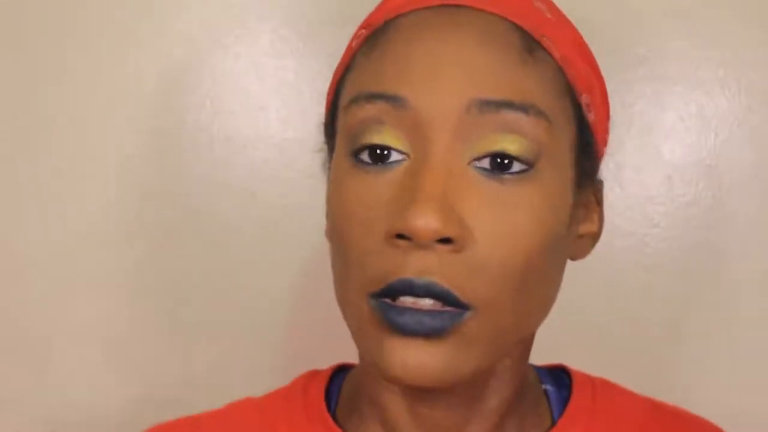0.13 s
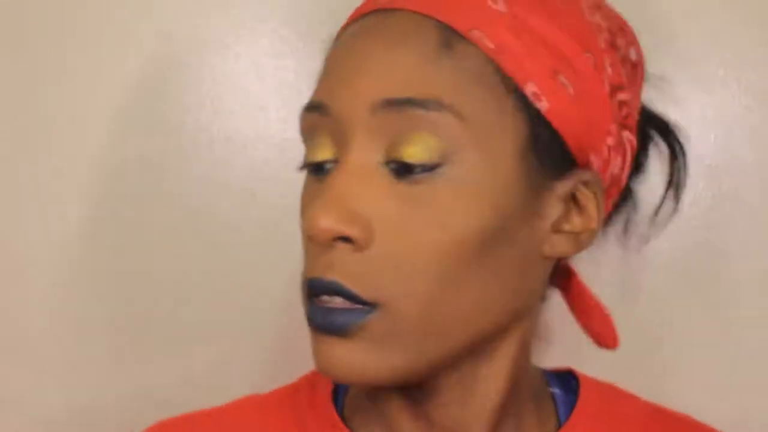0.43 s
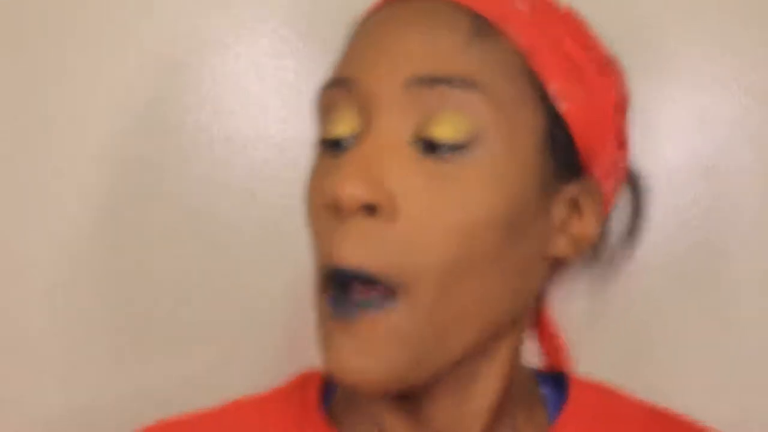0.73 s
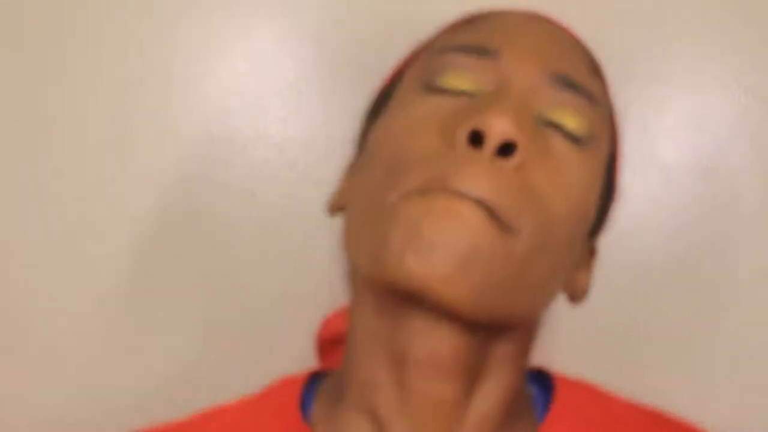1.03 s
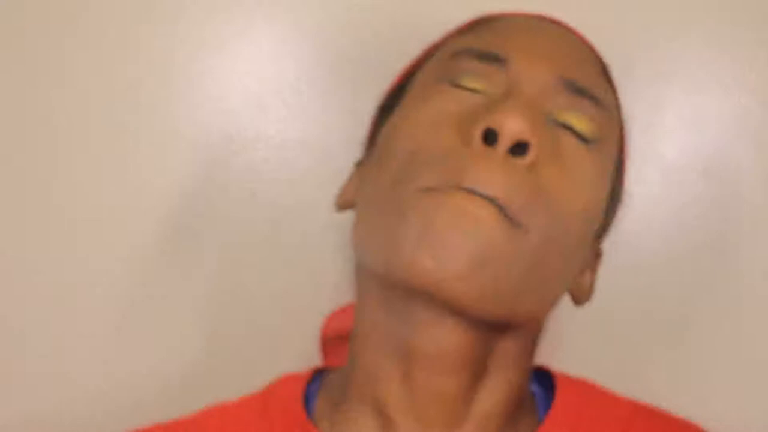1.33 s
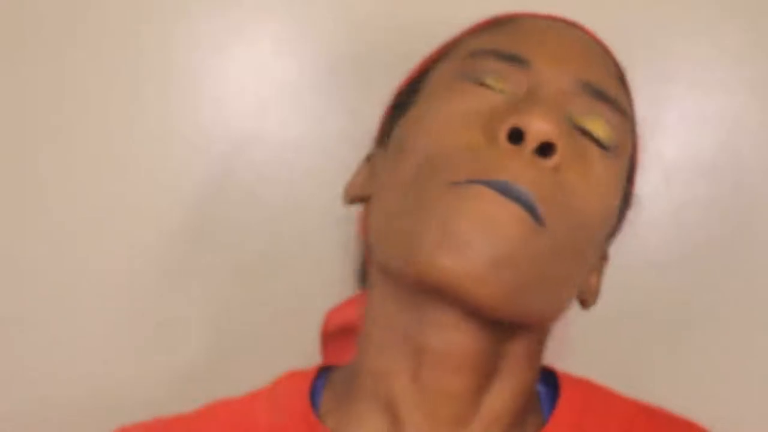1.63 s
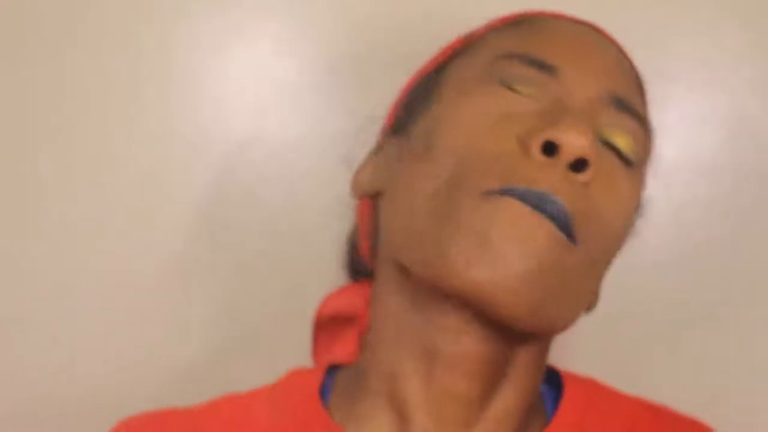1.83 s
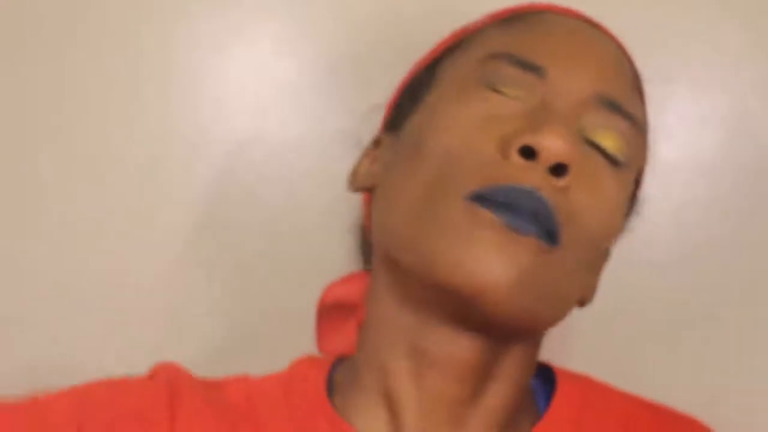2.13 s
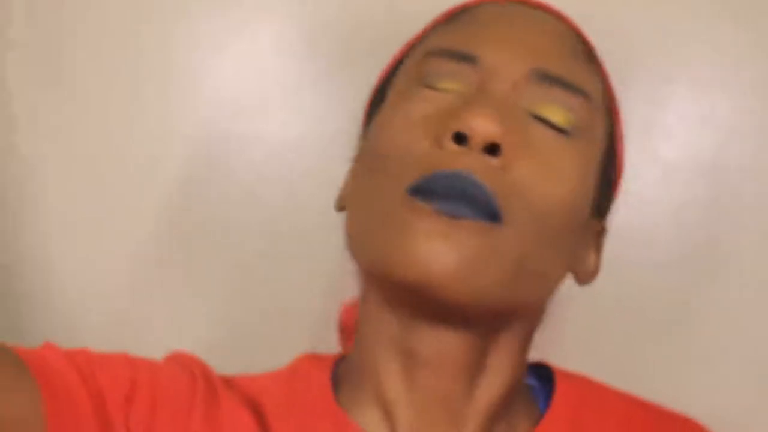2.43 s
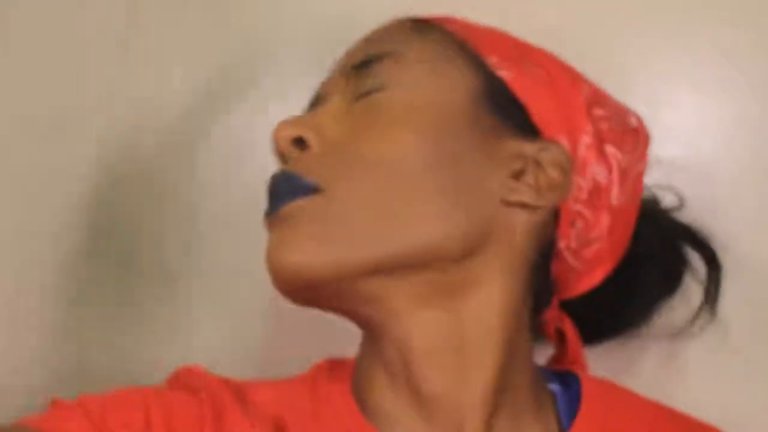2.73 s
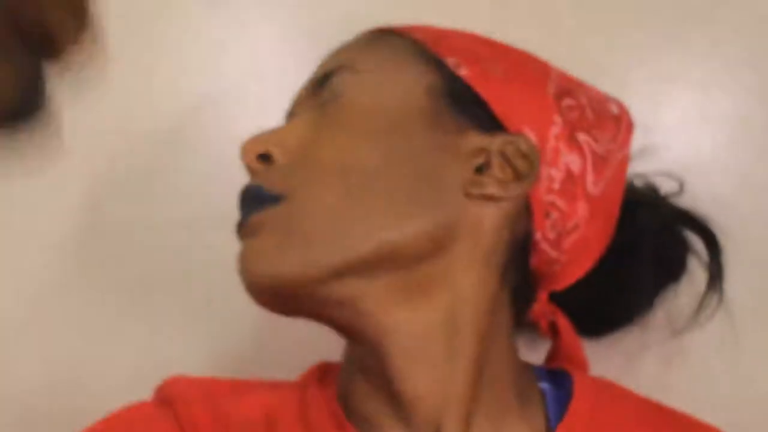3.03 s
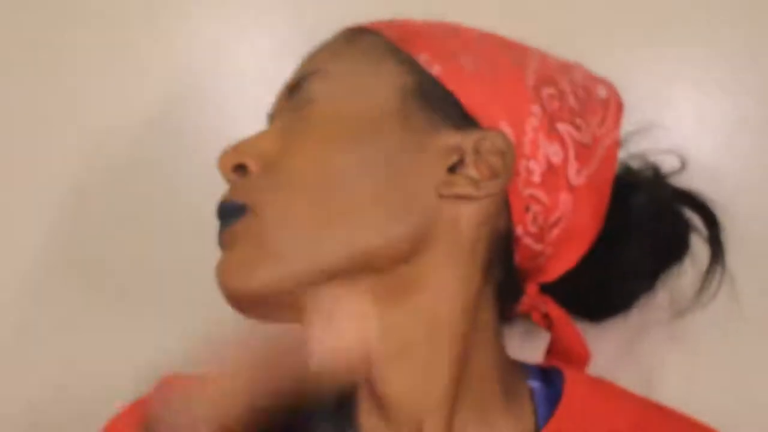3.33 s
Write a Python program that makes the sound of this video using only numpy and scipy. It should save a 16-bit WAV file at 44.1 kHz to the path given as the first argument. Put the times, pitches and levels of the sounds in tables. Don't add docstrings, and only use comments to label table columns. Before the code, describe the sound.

Pump spray bottle close to the microphone: brisk sloshing, a sharp cap pop, light plastic knocks, then six evenly spaced mist puffs with small gurgles and clicks between, in a quiet, lively indoor room with faint fan hum.

```python
import sys
import numpy as np
from scipy import signal
from scipy.fft import rfft, irfft, next_fast_len
from scipy.io import wavfile
from scipy.ndimage import uniform_filter1d

SR = 44100
rng = np.random.default_rng(int(sys.argv[2]) if len(sys.argv) > 2 else 0)


def invert_db(x):
    u = np.asarray(x, float) / 20
    return 10 ** u


def dump_mix(stems):
    frames = np.atleast_2d(stems).T
    limited = np.clip(frames, -1, 1)
    pcm = np.round(limited * 32767).astype(np.int16)
    wavfile.write(sys.argv[1], SR, pcm)


N = 154350


def unit(x):
    return x / np.sqrt(np.mean(x ** 2) + 1e-20)


def along(points, hz):
    f, v = np.transpose(points)
    return np.interp(np.log(hz + 1), np.log(f + 1), v)


def filtered(x, response):
    size = next_fast_len(N + 8192)
    hz = np.fft.rfftfreq(size, 1 / SR)
    return irfft(rfft(x, size) * response(hz), size)[..., :N]


def coloured(x, spectrum):
    return unit(filtered(x, lambda hz: invert_db(along(spectrum, hz))))


def patchy(patchy_db):
    z = signal.stft(rng.standard_normal(N), nperseg=256)[2]
    field = uniform_filter1d(rng.standard_normal(z.shape), 5, 0)
    field = uniform_filter1d(field, 8, 1)
    return signal.istft(z * invert_db(patchy_db * unit(field)), nperseg=256)[1][:N]


def grains(per_s, spread_db):
    when, size, sign = rng.random((3, N))
    height = invert_db(-spread_db * np.log(size + .05))
    return unit((when < per_s / SR) * height * np.sign(sign - .5))


def clicks(rows, t60, spread, crack_db, gain_db, late_s=.0012):
    out, t = np.zeros(N + SR), np.arange(1500) / SR
    for s, db, hz in rows:
        scatter = np.linspace(-1, 1, num=7) + rng.normal(0, .1, size=7)
        pitch = hz * np.exp(spread * scatter)[:, None]
        loudness = invert_db(-9 * np.abs(np.log(pitch / hz)) / spread)
        ring = (loudness * np.sin(2 * np.pi * pitch * t + rng.random((7, 1)))).sum(axis=0)
        crack = invert_db(crack_db - 60 * t / .003) * rng.standard_normal(len(t))
        band = [hz / 3.2, min(2.4 * hz, SR / 2.5)]
        click = signal.lfilter(*signal.butter(2, band, "band", fs=SR), ring * invert_db(-60 * t / t60) + crack)
        start = round((s + late_s) * SR)
        out[start:][:len(t)] += invert_db(db + gain_db) * click / np.abs(click).max()
    return out[:N]


def shaking():
    # (time [s], level [dB])
    trickle = [(0, -40), (.3, -41.5), (.6, -42.5), (.7, -56)]
    # (frequency [Hz], level [dB per Hz])
    liquid_colour = [(180, -39), (300, -21), (558, -20), (1060, -6.5), (1740, -5.5), (2480, 5), (6450, 4.5),
                     (15200, -26), (16500, -55)]
    # (time [s], level [dB], fade [s])
    surges = [(0.035, -26, 0.02), (.068, -35, 0.0095), (0.095, -26, 0.0097), (0.122, -26, 0.036),
              (.21, -28, 0.032), (0.292, -23, 0.015), (0.334, -32.5, 0.025), (.401, -28, 0.013),
              (.448, -55, 0.014), (.49, -37, 0.028), (.53, -31.5, 0.016), (.577, -50, 0.061)]
    # (time [s], peak level [dB], ring pitch [Hz])
    slaps = [(.0350, -20, 3000), (.0380, -17, 4300), (.0432, -16, 4500), (.0680, -16, 2600),
             (.0970, -21, 2500), (.1080, -21, 4000), (.1212, -11, 2900), (.1275, -11, 3600),
             (.1332, -13, 4500), (.1585, -17, 2600), (.2175, -17, 3800), (.2222, -16, 3500),
             (.2932, -13, 2700), (.2992, -16, 3000), (.3998, -16, 3400), (.4062, -16, 3300),
             (.4490, -21, 3500), (.5282, -18, 4500), (.5412, -20, 3500), (.5782, -22, 3500),
             (.5948, -22, 5000)]
    rise_s = 0.0078
    t = np.arange(N) / SR
    level = invert_db(np.interp(t, *np.transpose(trickle), right=-120))
    for s, db, fade in surges:
        since = np.clip(t - s, 0, 9)
        level = level + invert_db(db) * (1 - np.exp(-since / rise_s)) * np.exp(-(since / fade) ** 2)
    drops = grains(per_s=3400, spread_db=3.5)
    fizz = invert_db(0.5) * patchy(patchy_db=-2)
    liquid = level * coloured(unit(drops + fizz), liquid_colour)
    return liquid + clicks(slaps, t60=.003, spread=0.34, crack_db=11.5, gain_db=2, late_s=0)


def air():
    # (frequency [Hz], level [dB per Hz])
    air_colour = [(15, -12), (25, -9), (118, -1), (878, -7), (1180, -11), (1360, -9), (1730, -9.5),
                  (15200, -25), (16500, -14.5)]
    # (frequency [Hz], likeness [0-1])
    alike = [(30, 0.48), (60, 0.25), (200, 0.092), (800, 0.1), (8000, 0.96)]
    # (frequency [Hz], unsteadiness [Hz], level [dB])
    hum_tones = [
        (79, 5, 0),
        (144, 5, -5.5),
    ]
    # (time [s], level [dB])
    fan = [(0.0, -71), (0.74, -64), (0.81, -87), (0.94, -65.5), (2.63, -61), (2.78, -75), (2.88, -64.5),
           (3.47, -69), (3.5, -115)]
    air_db, air_top_hz, wobble_db = -52.5, 15100, 1.5

    def middle_and_side(hz):
        turn = np.arccos(np.clip(along(alike, hz), -1, 1)) / 2
        return invert_db(along(air_colour, hz)) * (hz < air_top_hz) * np.array([np.cos(turn), np.sin(turn)])

    def slow(top_hz):
        return unit(filtered(rng.standard_normal(N), lambda hz: hz < top_hz))

    mid, side = filtered(rng.standard_normal((2, N)), middle_and_side)
    t, hum = np.arange(N) / SR, np.zeros(N)
    for hz, unsteady_hz, db in hum_tones:
        strength = invert_db(db + 1 + wobble_db * slow(unsteady_hz))
        hum += strength * np.sin(2 * np.pi * hz * t + .5 * slow(unsteady_hz))
    hum *= invert_db(np.interp(t, *np.transpose(fan)))
    return invert_db(air_db) * unit(np.array([mid + side, mid - side])) + hum


def cap():
    # (time [s], peak level [dB], ring pitch [Hz])
    pops = [
        (.7128, -22, 3420),
        (.7166, -8, 4080),
        (.7170, -26, 1140),
        (.7228, -18, 4320),
    ]
    # (time [s], peak level [dB], ring pitch [Hz])
    knocks = [
        (.7728, -26, 2320),
        (.812, -30.5, 2020),
        (.826, -27, 2440),
        (.84, -33, 2400),
        (.856, -33.5, 2400),
        (.975, -23.5, 2070),
        (1.072, -43, 2500),
    ]
    pop = clicks(pops, t60=0.0068, spread=0.507, crack_db=3.5, gain_db=4.5, late_s=0)
    return pop + clicks(knocks, t60=.012, spread=.3, crack_db=-6, gain_db=4.5, late_s=0)


def mist():
    # (start [s], length [s], level [dB], time to full pressure [s], nozzle ring [dB])
    strokes = [
        (1.098, 0.15, -37.5, 0.11, -1),
        (1.55, 0.16, -36.5, 0.11, 1.5),
        (1.981, .15, -36, 0.073, 1),
        (2.376, .13, -35.5, 0.073, 2),
        (2.744, .15, -32.5, 0.073, 1),
        (3.137, 0.14, -32.5, 0.047, -1),
    ]
    trebles_db = [1.2, 1, 3.4, 1.4, -0.4, -2.4]
    # (frequency [Hz], level [dB per Hz])
    mist_colour = [(180, -67), (300, -29.5), (1250, -10.5), (2650, -1.5), (3970, -2), (6340, -1),
                   (10900, -5.5), (15200, -16), (16500, -33)]
    start_db, sag_db, attack_s, release_s = -7, -3, 0.0083, 0.015
    nozzle_hz, nozzle_wide_hz, sheen_hz, sheen_grows = 6300, 2500, 7700, 0.89
    t = np.arange(N) / SR
    level, sheen, song = np.zeros((3, N))
    for (s, length, db, rise, nozzle_db), treble_db in zip(strokes, trebles_db):
        since = t - s
        swell = start_db * np.clip(1 - since / rise, 0, 1) ** 2
        swell = swell + sag_db * np.clip(since / length, 0, 1) ** 4
        release = -20 * np.clip(since - length, 0, 1) / release_s
        stroke = np.clip(since / attack_s, 0, 1) * invert_db(db + swell + release)
        level += stroke
        sheen += stroke * (invert_db(treble_db + sheen_grows * swell) - 1)
        song += stroke * (invert_db(nozzle_db) - 1)
    spit = invert_db(-11.5) * grains(per_s=1500, spread_db=5.5)
    jet = coloured(patchy(patchy_db=2.0) + spit, mist_colour)
    nozzle = filtered(jet, lambda hz: np.exp(-((hz - nozzle_hz) / nozzle_wide_hz) ** 2))
    treble = filtered(jet, lambda hz: 1 / (1 + (sheen_hz / (hz + 1)) ** 4))
    return level * jet + sheen * treble + song * nozzle


def thuds():
    # (time [s], peak level [dB], ring pitch [Hz])
    stops = [
        (1.241, -43, 835),
        (1.619, -40, 872),
        (2.817, -40.5, 899),
    ]
    return clicks(stops, t60=0.017, spread=0.99, crack_db=-25, gain_db=4)


def pump():
    # (start [s], level [dB])
    refills = [
        (1.349, -42),
        (1.775, -44),
        (2.189, -50),
        (2.576, -52),
        (2.955, -50),
        (3.35, -49),
    ]
    # (time [s], peak level [dB], ring pitch [Hz])
    returns = [
        (1.3175, -38, 8000),
        (1.3752, -28, 5000),
        (1.8025, -23, 5500),
        (2.2125, -18, 6200),
        (2.5968, -14, 6100),
        (2.9682, -32, 2600),
        (2.9890, -17, 6000),
        (3.3718, -22, 6000),
    ]
    puffs_db = [-53, -40, -36.5, -43, -48, -71, -42.5, -45]
    # (frequency [Hz], level [dB per Hz])
    puff_colour = [(1500, -33), (3000, -9), (6000, 9.5), (10000, -4), (15500, -6)]
    refill_s, from_hz, to_hz, bubble_t60, scatter, puff_t60 = .06, 1860, 2770, .007, .3, 0.2
    gurgle, t, now = np.zeros(N + SR), np.arange(900) / SR, np.arange(N) / SR
    for s, db in refills:
        for when, pitch, size in rng.random((60, 3)):
            hz = (from_hz + (to_hz - from_hz) * when) * np.exp(scatter * (2 * pitch - 1))
            bubble = invert_db(db + 5.4 * size - 60 * t / bubble_t60) * np.sin(2 * np.pi * hz * t)
            gurgle[round((s + when * refill_s) * SR):][:len(t)] += bubble
    home = clicks(returns, t60=0.0049, spread=0.56, crack_db=-14, gain_db=3, late_s=0)
    puffs = np.zeros(N)
    for (s, _, _), puff_db in zip(returns, puffs_db):
        puffs += (now > s) * invert_db(puff_db - 60 * np.abs(now - s) / puff_t60)
    return gurgle[:N] + home + puffs * coloured(patchy(patchy_db=2.0), puff_colour)


def room(x):
    # (delay [s], left level [dB], right level [dB])
    walls = [
        (.0026, -2.5, -7.5),
        (.0065, -8.5, -5),
        (.0100, -14.5, -6),
        (0.0126, -13.5, -10.5),
        (.019, -14.5, -11.5),
    ]
    # (frequency [Hz], time to fall 60 dB [s])
    ring_times = [(300, 0.41), (2000, 0.46), (6000, .45), (14000, 0.16)]
    out, step = np.zeros((2, N + SR)), SR // 8
    for i in range(0, N, step):
        hz, t, z = signal.stft(rng.standard_normal((2, SR // 2)), SR, nperseg=256)
        fade = invert_db(-60 * t / along(ring_times, hz)[:, None])
        tail = signal.istft(z * fade, SR, nperseg=256)[1]
        tail = np.pad(tail / np.linalg.norm(tail[0]), ((0, 0), (200, 0)))
        shifts_s = rng.normal(0, .0003, size=len(walls))
        for (delay, left_db, right_db), shift in zip(walls, shifts_s):
            tail[:, int((delay + shift) * SR)] += invert_db([left_db, right_db])
        wet = signal.fftconvolve(x[None, i:i + step], tail, axes=1)
        out[:, i:][:, :wet.shape[1]] += wet
    return out[:, :N]


def scene():
    # (frequency [Hz], level [dB])
    room_tone = [(500, -6), (3000, -4), (8000, -3.5), (14000, -2)]
    # (frequency [Hz], level [dB])
    pan = [(300, 0), (1200, 0), (2800, 1.5), (9000, 0.45), (14000, -0.5)]

    def thin(hz):
        ratio = 1j * hz / 606
        return (ratio / (1 + ratio)) ** 2

    bottle = filtered(shaking() + cap() + pump(), thin) + mist() + thuds()
    heard = bottle + room(filtered(bottle, lambda hz: invert_db(along(room_tone, hz))))
    return filtered(heard, lambda hz: invert_db(along(pan, hz) * [[1], [-1]])) + air()


def band_limit(x):
    return signal.sosfilt(signal.butter(12, 16820, fs=SR, output="sos"), x)


def record(dry):
    mix = filtered(dry, lambda hz: np.where(hz < 15850, 1, invert_db(-50)))
    return band_limit(mix)


dry = scene()
out = record(dry)
dump_mix(out)
```